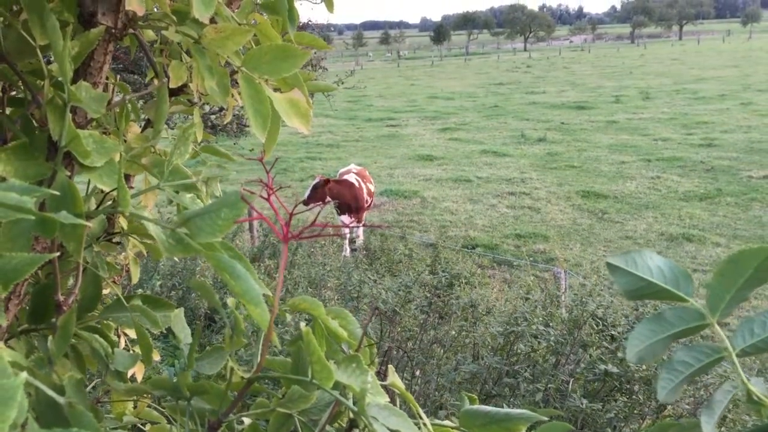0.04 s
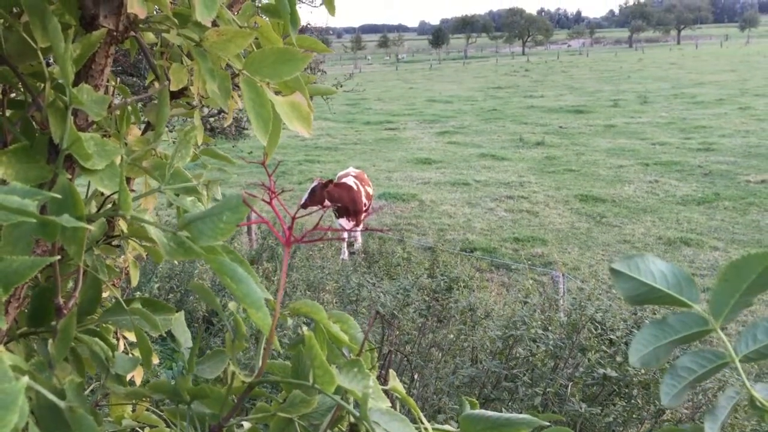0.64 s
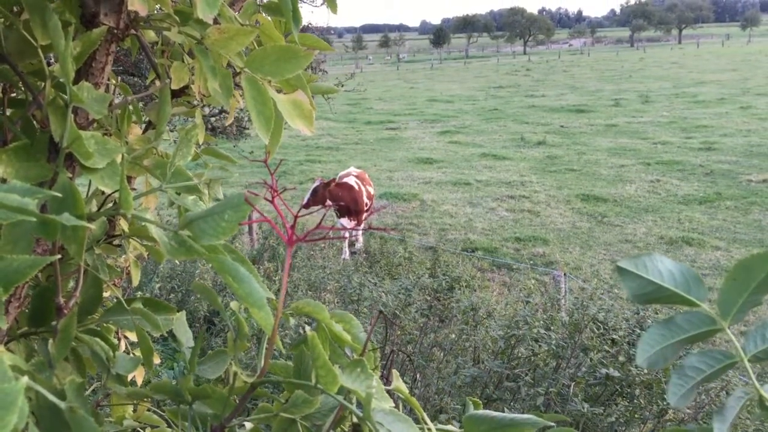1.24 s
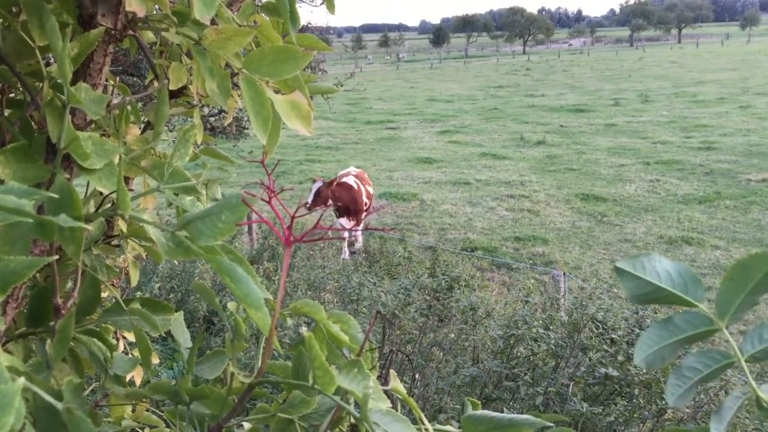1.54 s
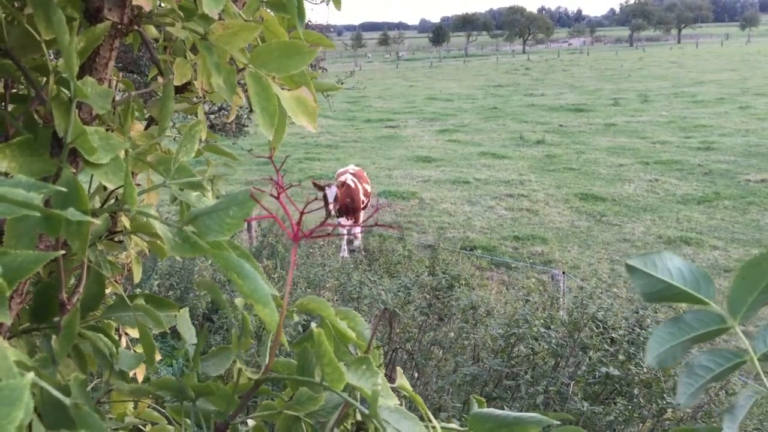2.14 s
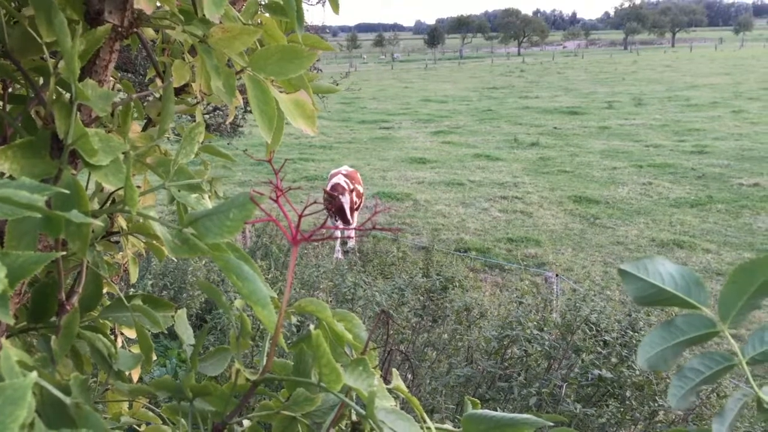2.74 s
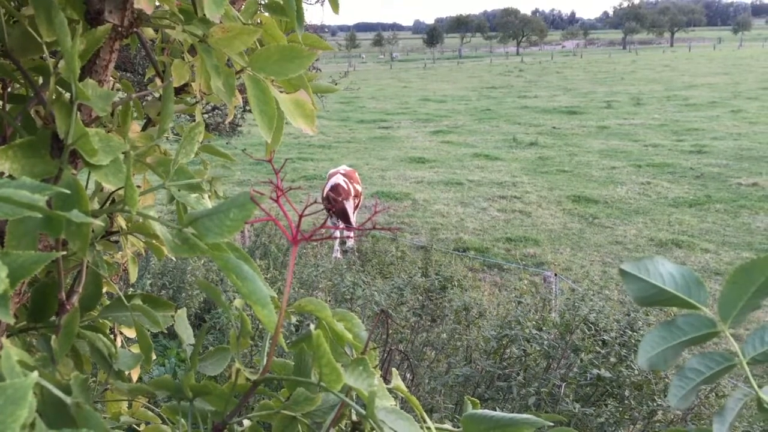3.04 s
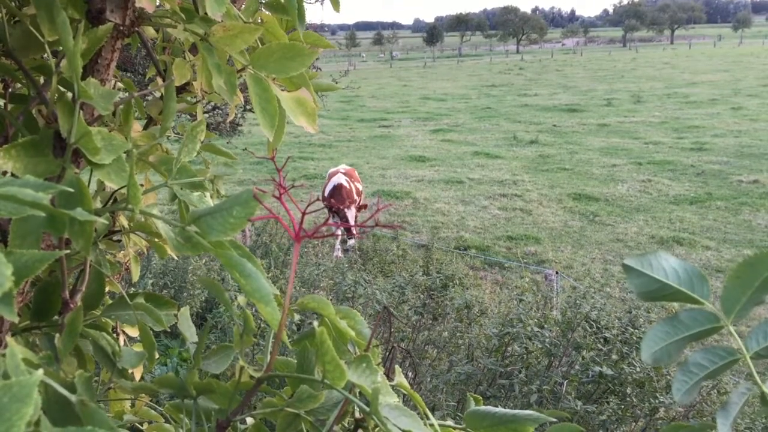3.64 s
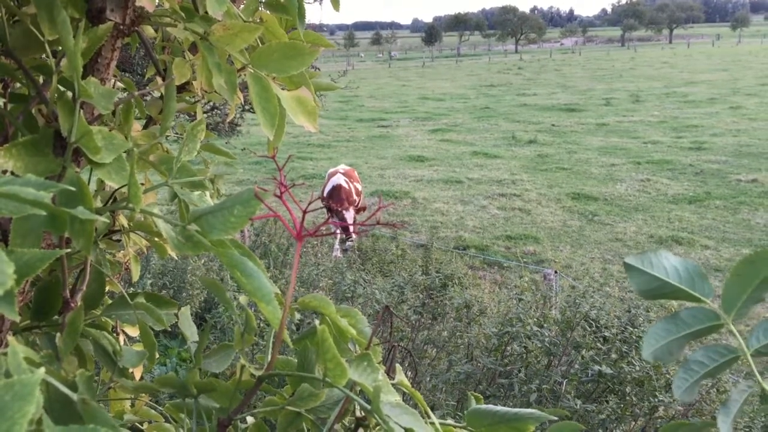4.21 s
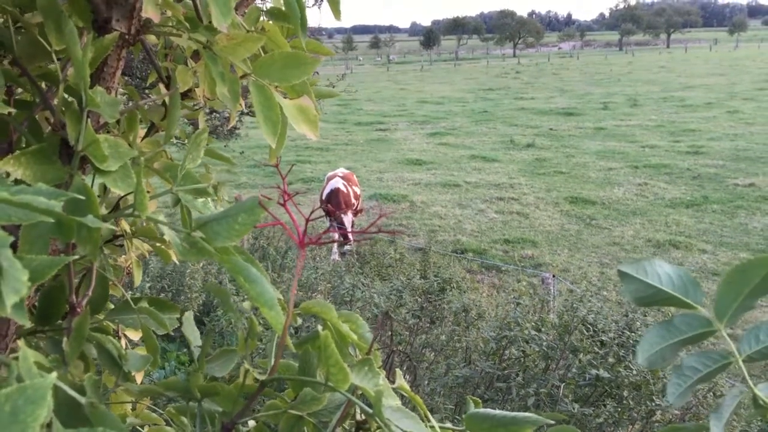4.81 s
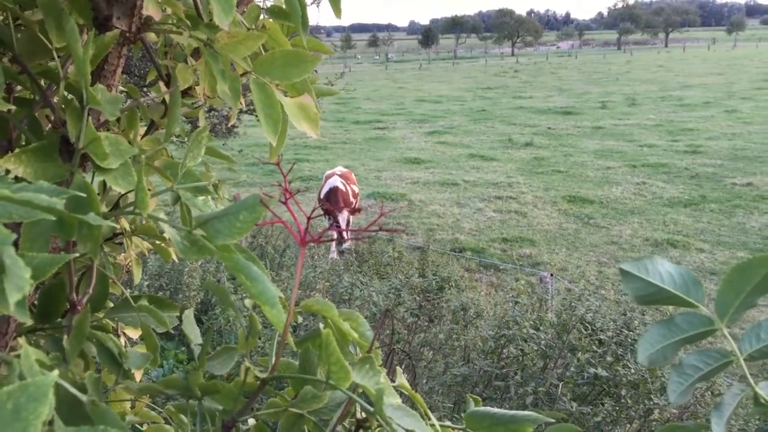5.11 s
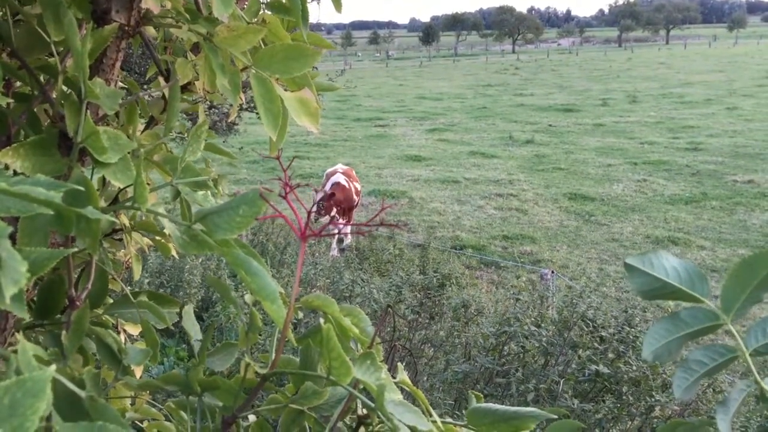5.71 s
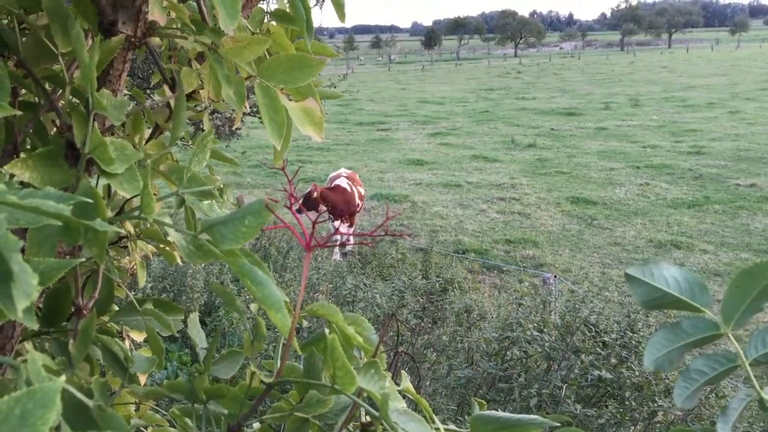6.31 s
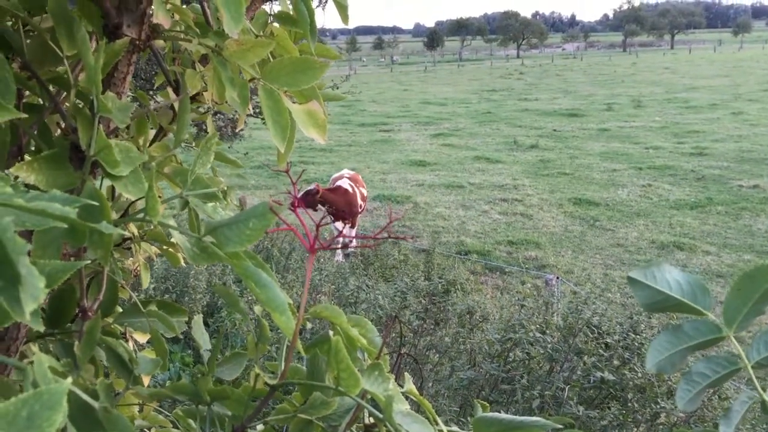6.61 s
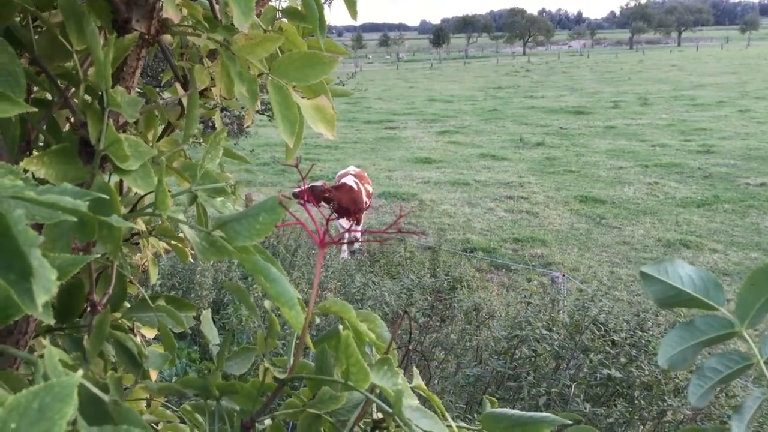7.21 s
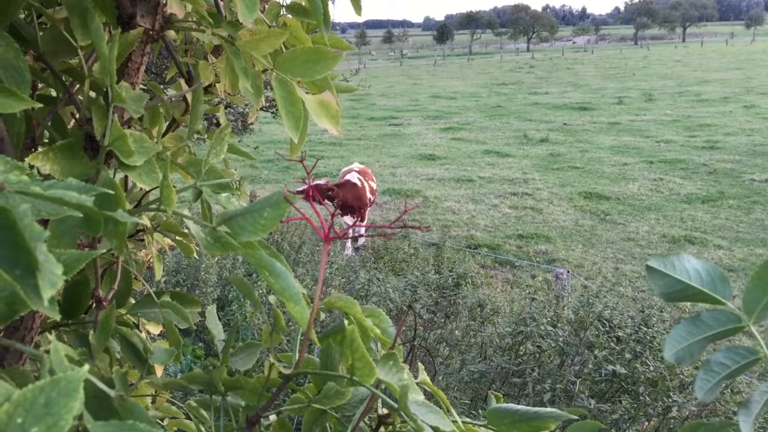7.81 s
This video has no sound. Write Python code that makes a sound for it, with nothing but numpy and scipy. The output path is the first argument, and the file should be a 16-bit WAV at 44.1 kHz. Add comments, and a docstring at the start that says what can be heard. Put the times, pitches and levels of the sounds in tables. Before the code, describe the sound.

In an open pasture, a soft low breeze rumble and a faint even hiss run throughout. For about six seconds, distant birds drop short, raspy caws at uneven intervals. Then a young cow, fairly near the microphone, moos once: a closed-mouth growl climbs and swells, breaks into a high, hoarse bellow, and clears as its pitch sinks at the end.

```python
"""A pasture: a bed of low, breezy rumble and faint even hiss runs throughout.
For the first six seconds, jackdaw-like birds drop short, raspy calls from distant trees.
Then a young cow moos once, fairly near, its vocal folds pulsing through nose and throat.
A closed-mouth growl climbs and swells; the mouth opens and, near 6.8 s, the voice breaks
into a high, hoarse bellow that clears as it sinks."""
import sys
import numpy as np
from scipy import signal
from scipy.fft import rfft, irfft, next_fast_len
from scipy.io import wavfile
from scipy.ndimage import uniform_filter1d

SR = 44100
rng = np.random.default_rng(int(sys.argv[2]) if len(sys.argv) > 2 else 0)


def generate_wav(sig):
    """Save sig (samples, or channels by samples) to the path in sys.argv[1] as 16-bit PCM at SR."""
    pcm = np.round(np.clip(np.atleast_2d(sig).T, -1, 1) * 32767).astype(np.int16)
    wavfile.write(sys.argv[1], SR, pcm)


N = 350595
TIME = np.arange(N) / SR

# the growl's climb in the low register, the bellow's arch in the high one: (time [s], pitch [Hz])
GROWL_PITCH = [(6.2, 54.9), (6.342, 66.5), (6.482, 81.9), (6.586, 105.7), (6.706, 134), (6.77, 164.3)]
BELLOW_PITCH = [(6.795, 238.4), (6.93, 275.1), (7.05, 302), (7.16, 320.5), (7.375, 325.8), (7.6, 315),
                (7.705, 308), (7.8, 294.6), (7.95, 269.1)]
# nose and throat formants, mouth shut, half open and wide: (centre [Hz], width [Hz], relative level [dB])
SHUT_FORMANTS = [(300, 160, -14), (526, 170, -2), (820, 400, 1), (1097, 130, -22.5), (1567, 150, 0),
                 (2133, 130, -29.5), (2720, 190, -11), (3250, 190, -14), (3870, 700, -23)]
HALF_FORMANTS = [(605, 186, -0.5), (983, 187, 3.5), (1317, 75, -3), (1642, 240, -10), (2130, 187, -8.5),
                 (2883, 250, -19.5), (3400, 910, -32), (5420, 2500, -46.5), (9000, 29000, -54.5)]
WIDE_FORMANTS = [(640, 370, 0), (920, 420, -2), (1335, 170, 1), (1606, 507, 1), (2156, 230, -15),
                 (2730, 210, -13), (3100, 450, -24.5), (3460, 110, -20.5), (3680, 360, -33.5),
                 (4320, 420, -32), (5330, 1200, -33)]
# mouth movement: (time [s], opening [0 shut, 1 half, 2 wide])
MOUTH_OPENING = [(6.71, 0.18), (6.75, 1.6), (6.87, 0.77), (7.07, 1.67), (7.6, 1.71), (7.82, 1.48),
                 (7.9, 1.75)]
# the neck stretches and lowers every formant: (time [s], formant shift [ratio])
NECK_STRETCH = [(6.38, 1.11), (6.52, 1.035), (6.78, .975), (6.9, 1.015), (7.1, 0.996), (7.95, 1.001)]
# weight of the two lowest harmonics through the nose: (frequency [Hz], level over the overtones [dB])
NOSE_HUM = [(64, 4.5), (79, 15), (98, 9), (130, 9), (155, 10), (190, 9), (250, -7), (330, -12.5)]
# the same two through the open mouth: (frequency [Hz], level [dB])
MOUTH_BOOM = [(245, -28), (271, -24.5), (290, -32), (304, -35.5), (316, -33), (330, -33), (490, -42),
              (550, -29.5), (615, -31), (650, -33.5)]
# the cow pushes harder just after the break and as the pitch sinks: (time [s], width [s], boost [dB])
BELLOW_PUSHES = [(6.84, .11, 9.5), (7.93, 0.037, 4)]
# colour of the nostril breath in the growl: (frequency [Hz], relative level [dB])
NOSTRIL_SPECTRUM = [(1000, -59), (7000, -7), (8200, -1), (9100, 3), (10500, -18), (16000, -32)]
# bird cues: (start [s], length [s], pitch [Hz], roughness [0-1], relative level [dB], tilt [dB/harmonic])
BIRD_CALLS = [(0.452, 0.11, 497.5, 0.44, -61.5, -4.5), (0.523, .11, 454, 0.4, -66, 1.5),
              (0.671, .15, 450.4, 0.15, -59, 4), (1.411, .175, 443.7, 0.25, -64, 7.5),
              (2.67, 0.13, 440, 0.45, -72, 4), (2.749, 0.08, 492, 0.64, -69.5, -5.5),
              (2.797, 0.14, 458, 0.58, -73, 1.5), (3.271, 0.2, 452, 0.31, -63, 4.5),
              (3.879, .2, 438.5, .3, -67, 3), (3.967, 0.16, 450.5, 0.41, -59.5, .7),
              (4.095, 0.11, 376.4, 0.31, -73, -4), (4.468, .153, 428, .5, -74, 3),
              (4.637, 0.07, 488, 0.4, -69, -6), (4.662, 0.18, 443.5, .35, -69.5, 6),
              (5.071, 0.148, 434, .25, -70.5, 1), (5.949, 0.164, 422.7, 0.22, -62, 3)]
# colour of the low rumble: (frequency [Hz], relative level [dB])
RUMBLE_SPECTRUM = [(20, -56), (35, -36), (50, -3.5), (70, 1), (95, 0.5), (120, 4), (165, -8.5), (230, -5),
                   (300, -13.5), (420, -24.5), (700, -64.5), (3000, -120)]
# colour of the faint steady hiss, with the microphone's notches: (frequency [Hz], relative level [dB])
HISS_SPECTRUM = [(100, 3.5), (400, -1.5), (620, -4), (1050, -3.5), (1500, -6.5), (2000, -8), (3000, -10.5),
                 (4300, -12), (4900, -16), (5400, -13), (7500, -16.5), (9300, -16), (10400, -21),
                 (11200, -18), (15700, -21.5)]
# the breeze rides the rumble's fader: (time [s], level [dB])
BREEZE_LEVEL = [(0, -67.5), (1, -67), (1.95, -59.5), (2.4, -63), (3.95, -57.5), (5, -62.5), (5.85, -64.5),
                (6.3, -58.5), (7.95, -60.5)]
# soft buffets in the rumble: (time [s], boost [dB])
BREEZE_BUFFETS = [(1.94, 5), (2.05, 3), (2.78, 9), (2.94, 10), (3.45, 6.5), (3.85, 10.5), (4.46, 10),
                  (4.69, 5), (4.79, 6), (5.21, 7.5), (6.14, 13)]
# reverb of the pasture: (frequency [Hz], time to fall 60 dB [s])
FIELD_DECAY = [(200, 0.68), (1500, 0.34), (6000, 0.077)]

GROWL_START_S, GROWL_ATTACK_S, GROWL_DB, GROWL_DB_PER_S = 6.15, .16, -71.5, 40.5
OPEN_S, OPEN_RISE_S, BELLOW_DB = 6.727, .01, -39  # the overtones surge as the mouth opens
BREAK_S, BREAK_WIDTH_S, BREAK_ROUGH = 6.785, .018, .5  # the register flips with a short rasp
# strong and weak pulses alternate just after the break, and less deeply under strain
DOUBLING_S, DOUBLING_WIDTH_S, DOUBLING_DEPTH, STRAIN_DOUBLING = 6.91, .09, .92, .5
# strain sets in above a pitch, lags behind it and makes the voice hoarse
STRAIN_HZ, STRAIN_WIDTH_HZ, STRAIN_LAG_S, EASY_ROUGH, STRAIN_ROUGH = 302, 6, .04, .085, .66


def cow():
    """The moo: fold pulses ring an opening throat, over two clean low harmonics and a nostril breath."""
    t = TIME[TIME > GROWL_START_S]
    pitch = curve(list(GROWL_PITCH) + list(BELLOW_PITCH), t)
    first_db, second_db, overtone_db = voice_levels(t, pitch)
    rough, alternation = hoarseness(t, pitch)
    # strain makes the pitch quaver, and single cycles come early or late
    cycles = np.cumsum(pitch * (1 + .028 * rough * wander(35, len(t)))) / SR
    jittered = cycles + (.0047 + .037 * rough) * wander(220, len(t))
    buzz = vocal_folds(jittered, pitch, rough, alternation)
    # crossfade the throat shapes as the mouth opens, then even out the level
    mouth, stretch = curve(MOUTH_OPENING, t), curve(NECK_STRETCH, t)
    overtones = sum(np.maximum(1 - abs(mouth - k), 0) * unit(throat(buzz, formants, stretch))
                    for k, formants in enumerate([SHUT_FORMANTS, HALF_FORMANTS, WIDE_FORMANTS]))
    overtones /= np.sqrt(abs(uniform_filter1d(overtones ** 2, size=1800)) + 1e-9)
    phase = np.pi * (cycles + jittered)  # the low end takes half the jitter
    low_end = amp(first_db) * np.cos(phase) + amp(second_db) * np.cos(2 * phase)
    low_end *= np.sqrt(2) * (1 + .29 * rough * wander(100, len(t)))
    voice = np.pad(low_end + amp(overtone_db) * overtones, (N - len(t), 0))
    breath = amp(-78) * bump(TIME, 6.6, .13) * noise(NOSTRIL_SPECTRUM)
    return voice + breath


def vocal_folds(cycles, pitch, rough, alternation):
    """The raw buzz: one pulse and one rush of air a cycle, breathier as the voice roughens."""
    pulses = np.sinc((cycles - np.round(cycles)) / pitch * SR / 2) * np.cos(np.pi * cycles) ** 2
    pulses *= 1 + alternation * np.cos(np.pi * cycles)
    # the two lowest harmonics are left to their own clean layer
    pulses -= 4 * pitch / SR * (.5 + np.cos(2 * np.pi * cycles) + np.cos(4 * np.pi * cycles))
    airflow = .5 + np.exp(-(cycles % 1) / .5)
    puffs = unit(airflow * rng.standard_normal(len(cycles)))
    buzz = (1 - rough) * unit(pulses) + rough * puffs
    treble = signal.butter(2, 3800, "high", fs=SR, output="sos")
    return buzz + signal.sosfiltfilt(treble, 1.3 * puffs - buzz)  # air takes over the top end


def throat(buzz, formants, stretch, size=4096):
    """Rings the buzz through steep-sided formants, all shifted by the stretch ratio."""
    hz = abs(np.fft.fftfreq(size, 1 / SR))
    power = sum(amp(db) ** 2 / (1 + (2 * (hz - f) / width) ** 2) ** 3 for f, width, db in formants)
    low_cut = hz ** 4 / (hz ** 4 + 130 ** 4)
    log_gain = np.log(power * low_cut + 1e-10) / 2
    ring = np.fft.ifft(np.exp(np.conj(signal.hilbert(log_gain)))).real  # minimum phase: no pre-ring
    clock = np.cumsum(stretch)  # a faster clock raises the formants
    ticks = np.arange(clock[-1])
    rung = signal.oaconvolve(np.interp(ticks, clock, buzz), ring)[:len(ticks)]
    return np.interp(clock, ticks, rung)


def hoarseness(t, pitch):
    """Roughness and pulse alternation: both come with the register break and the strain of high pitch."""
    lagged_pitch = np.interp(t - STRAIN_LAG_S, t, pitch)
    strain = step((lagged_pitch - STRAIN_HZ) / STRAIN_WIDTH_HZ)
    doubling = DOUBLING_DEPTH * bump(t, DOUBLING_S, DOUBLING_WIDTH_S)
    crack = BREAK_ROUGH * bump(t, BREAK_S, BREAK_WIDTH_S)
    rough = EASY_ROUGH + STRAIN_ROUGH * strain + crack + .05 * doubling
    return np.clip(rough, 0, 1), doubling + STRAIN_DOUBLING * strain


def voice_levels(t, pitch):
    """Faders in dB for fundamental, second harmonic and overtones: the growl swells into the bellow."""
    attack = np.clip((t - GROWL_START_S) / GROWL_ATTACK_S, 1e-3, 1)
    swell_db = GROWL_DB_PER_S * (np.minimum(t, BREAK_S) - GROWL_START_S)
    growl_db = GROWL_DB + swell_db + 20 * np.log10(attack)
    opened = step((t - OPEN_S) / OPEN_RISE_S)
    high = step((t - BREAK_S) / .005)  # the register flips almost at once
    bellow_db = BELLOW_DB + high * sum(db * bump(t, s, width_s) for s, width_s, db in BELLOW_PUSHES)
    first_db, second_db = [(1 - high) * (growl_db + at_hz(NOSE_HUM, hz)) + high * at_hz(MOUTH_BOOM, hz)
                           for hz in (pitch, 2 * pitch)]
    return first_db, second_db, (1 - opened) * growl_db + opened * bellow_db


def nose_whistle(peak_s=6.39, width_s=.05, centre_hz=3120, fall_hz_per_s=1600, level_db=-67):
    """A thin, breathy whistle from the nostrils falls during the growl."""
    hz = centre_hz - fall_hz_per_s * (TIME - peak_s) + 55 * wander(169, N)
    tone = np.sqrt(2) * np.sin(2 * np.pi * np.cumsum(hz) / SR)
    return amp(level_db) * bump(TIME, peak_s, width_s) * tone


def birds(snap_depth=.16, snap_s=.029, sag_per_s=.673, flank_db=-1.1):
    """Short caws, harsh or clear, that start flat, snap up and sag; harmonics 3 to 5 carry them."""
    out = np.zeros(N)
    for start, length, pitch, rough, level_db, tilt_db in BIRD_CALLS:
        size = int(length * SR)
        age = np.arange(size) / SR
        bend = 1 - snap_depth * bump(age, 0, snap_s) - sag_per_s * age ** 2 / length
        cycles = np.cumsum(pitch * bend * (1 + .0615 * rough * wander(104, size))) / SR
        # the beak favours the fourth harmonic; the tilt leans each call dark or bright
        third_db, fifth_db = level_db + flank_db - tilt_db, level_db + flank_db + tilt_db
        harmonics_db = [third_db - 18, third_db, level_db, fifth_db, fifth_db - 18.5, fifth_db - 23.5]
        swell = np.sqrt(2) * np.sin(np.pi * (age / length) ** 1.05) ** .46
        for k, db in enumerate(harmonics_db, 2):
            rasp = unit(1 + 1.5 * rough * wander(130, size))  # each harmonic flutters by itself
            out[int(start * SR):][:size] += amp(db) * swell * rasp * np.sin(2 * np.pi * k * cycles)
    return out


def field_echo(x, size=30000, echoes_per_s=2000, predelay_s=.008):
    """Scattered echoes from hedges and trees, the highs dying first."""
    taps = rng.standard_normal(size) * (rng.random(size) < echoes_per_s / SR)
    taps *= np.arange(size) > predelay_s * SR
    hz, t, bands = signal.stft(taps, SR, nperseg=256)
    decay = amp(-60 * t / at_hz(FIELD_DECAY, hz)[:, None])
    tail = signal.istft(bands * decay, SR)[1]
    return signal.oaconvolve(x, tail / np.linalg.norm(tail))[:N]


def background(calm_db=-58, buffet_width_s=.038, hiss_db=-65.5):
    """The bed: a lumpy low rumble that follows the breeze and its buffets, plus an even hiss."""
    breeze_db = curve(BREEZE_LEVEL, TIME) - calm_db
    buffet_db = sum(db * bump(TIME, s, buffet_width_s) for s, db in BREEZE_BUFFETS)
    rumble = noise(RUMBLE_SPECTRUM)
    sub, lows = [signal.sosfiltfilt(signal.butter(4, hz, fs=SR, output="sos"), rumble)
                 for hz in (85, 165)]
    # the middle band takes the full breeze and buffets; the sub and the top take a share
    body = amp(.2 * breeze_db + .41 * buffet_db) * sub
    body += amp(breeze_db + buffet_db) * (lows - sub)
    body += amp(.7 * breeze_db + .057 * buffet_db) * (rumble - lows)
    return amp(calm_db + 2.1 * wander(33, N)) * body + amp(hiss_db) * noise(HISS_SPECTRUM)


def amp(db):
    """Decibels to gain."""
    return 10 ** (np.asarray(db) / 20)


def unit(x):
    """Scales to rms 1."""
    return x / np.sqrt(np.mean(x ** 2) + 1e-20)


def curve(points, t):
    """An automation curve: straight lines between breakpoints."""
    return np.interp(t, *np.transpose(points))


def at_hz(points, hz):
    """Reads a table along a log-frequency axis."""
    f, value = np.transpose(points)
    return np.interp(np.log(hz + 1), np.log(f + 1), value)


def noise(spectrum):
    """Coloured noise of rms 1."""
    gain = amp(at_hz(spectrum, np.fft.rfftfreq(N, 1 / SR)))
    return unit(irfft(rfft(rng.standard_normal(N)) * gain, N))


def wander(rate_hz, size):
    """Smooth random modulation of rms 1, rolling off above the rate."""
    span = next_fast_len(size)
    hz = np.fft.rfftfreq(span, 1 / SR)
    return unit(irfft(rfft(rng.standard_normal(span)) / (1 + (hz / rate_hz) ** 4), span)[:size])


def step(x):
    """A smooth rise from 0 to 1 around x = 0."""
    return .5 + .5 * np.tanh(x / 2)


def bump(t, peak_s, width_s):
    """A smooth hump of height 1."""
    return np.exp(-((t - peak_s) / width_s) ** 2)


def scene():
    """The mono mix: the cow fairly near and dry, the birds far off and wetter, the bed under them."""
    moo, calls = cow() + nose_whistle(), birds()
    near = moo + amp(-25) * field_echo(moo)
    far = amp(-.35) * calls + amp(-9.5) * field_echo(calls)
    return (near + far + background())[None]


def record(dry):
    """A steep low-pass at 15720 Hz trims the very top."""
    low_pass = signal.firwin(511, 15720, window=("kaiser", 9), fs=SR)
    return signal.oaconvolve(dry, low_pass[None], "same")


dry = scene()
out = record(dry)
generate_wav(out)
```